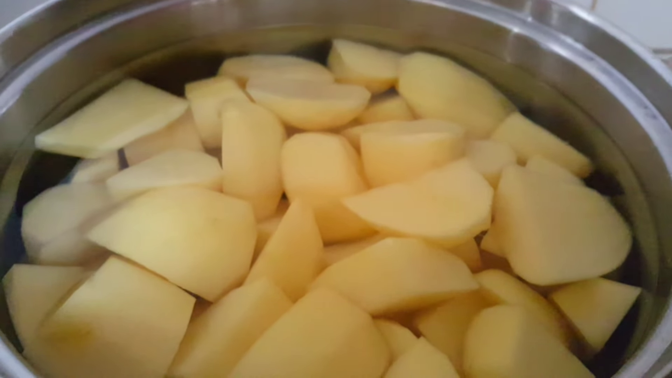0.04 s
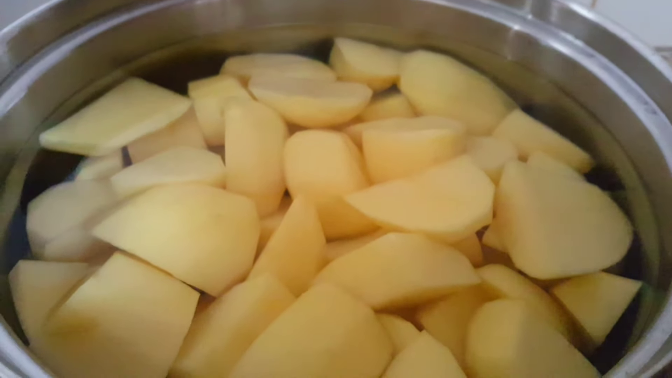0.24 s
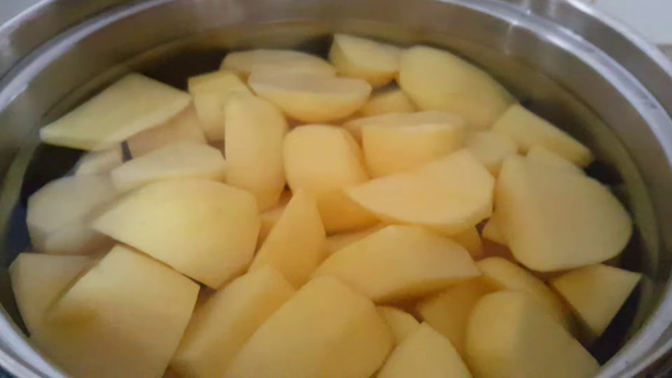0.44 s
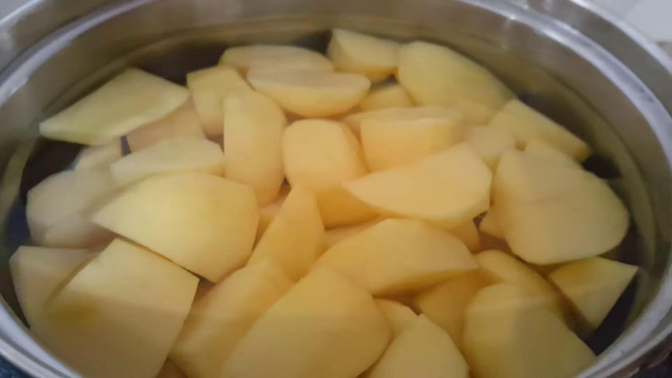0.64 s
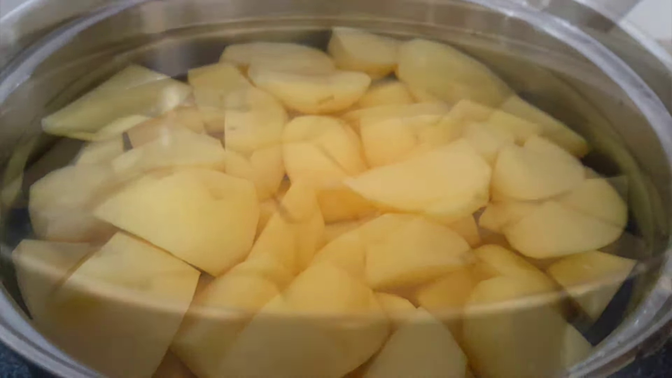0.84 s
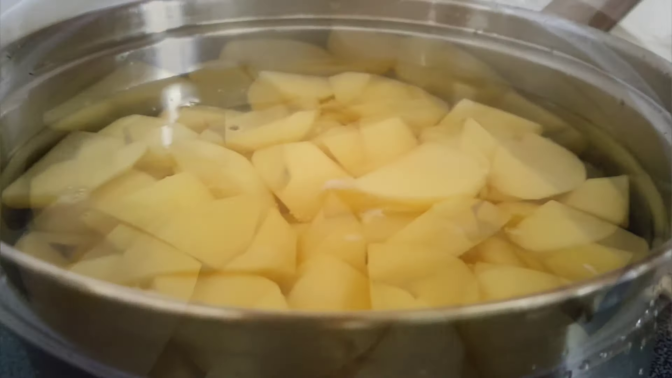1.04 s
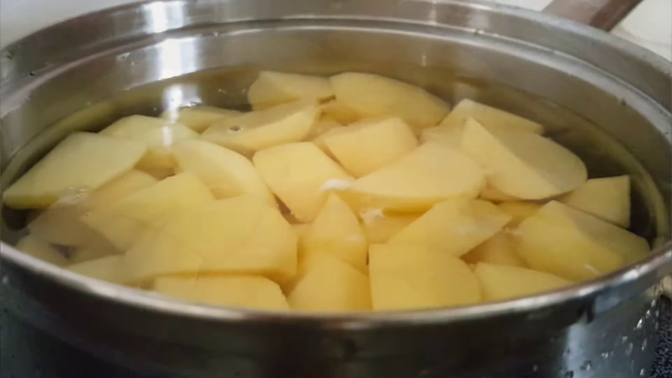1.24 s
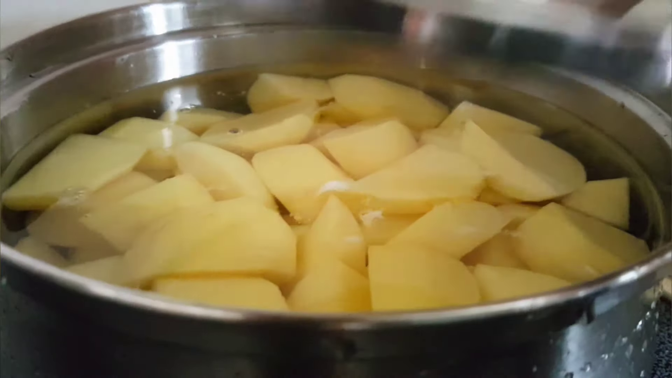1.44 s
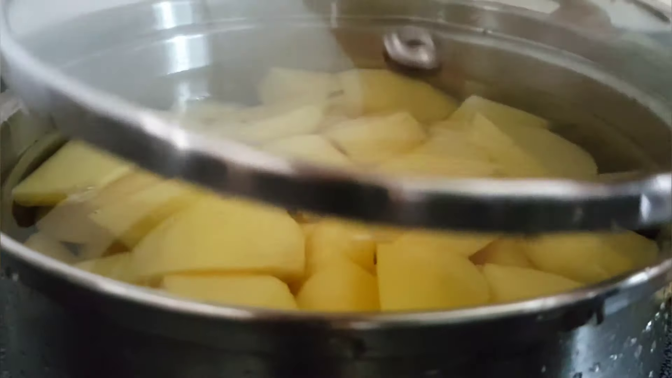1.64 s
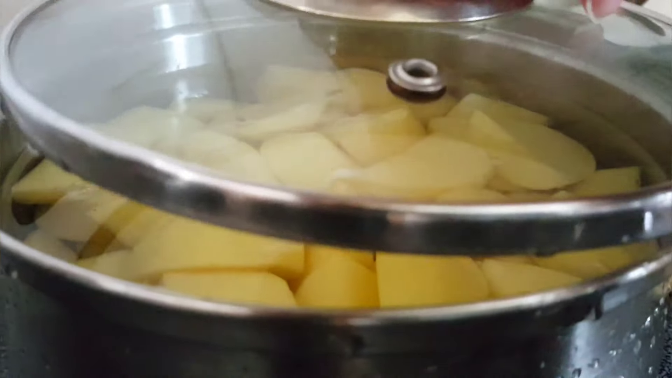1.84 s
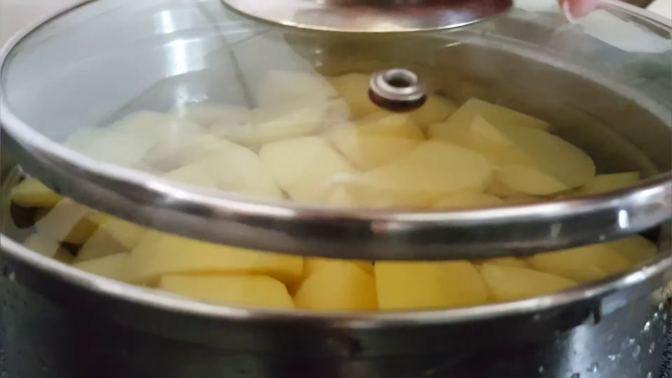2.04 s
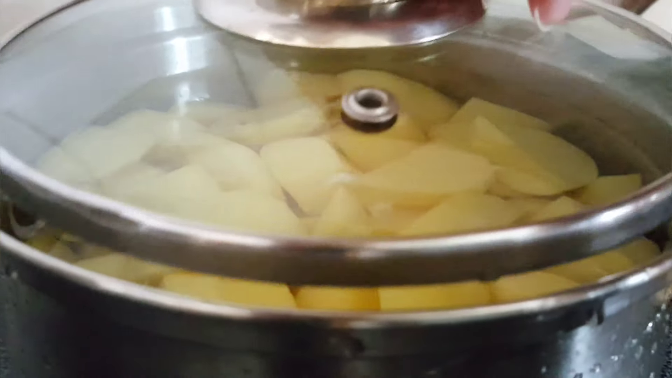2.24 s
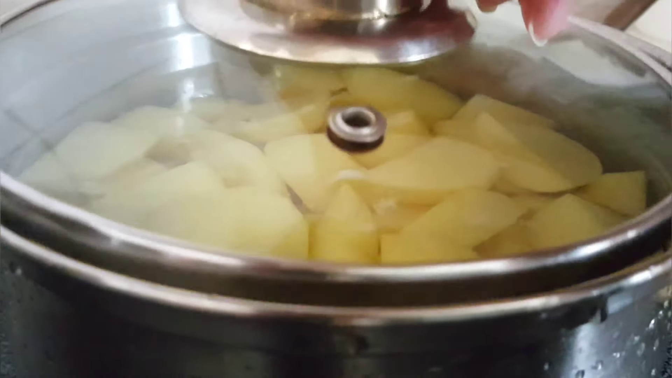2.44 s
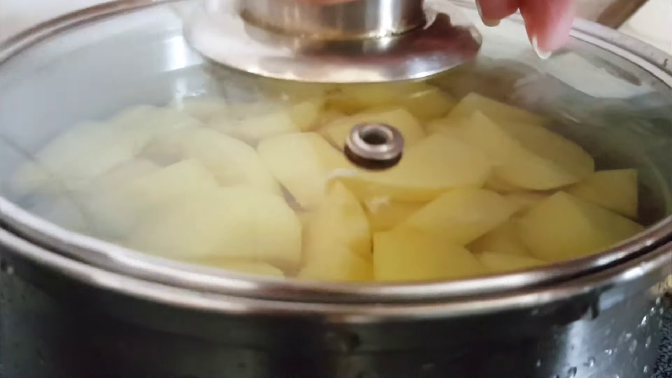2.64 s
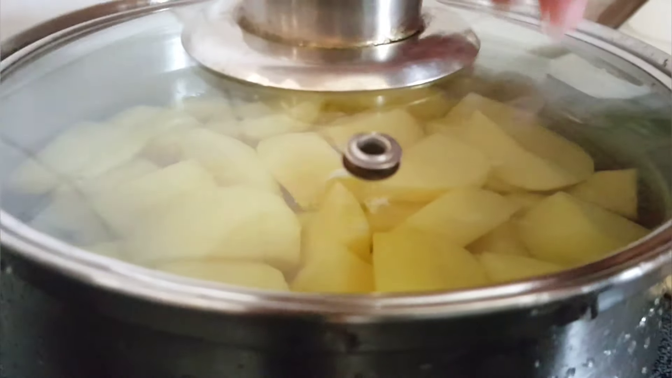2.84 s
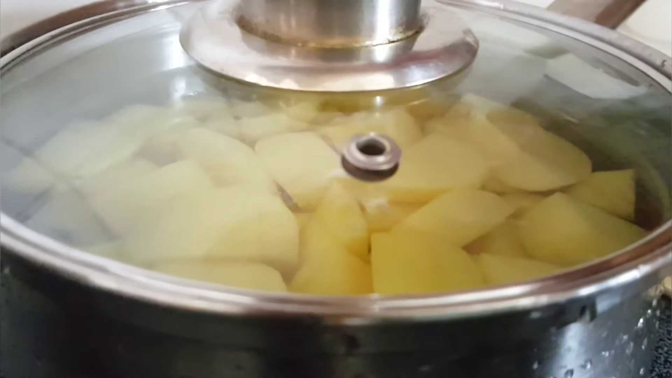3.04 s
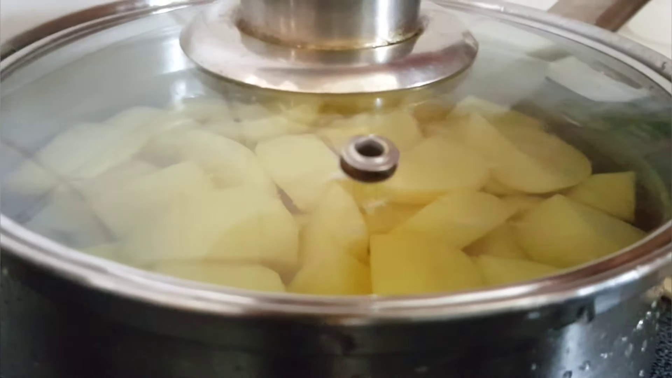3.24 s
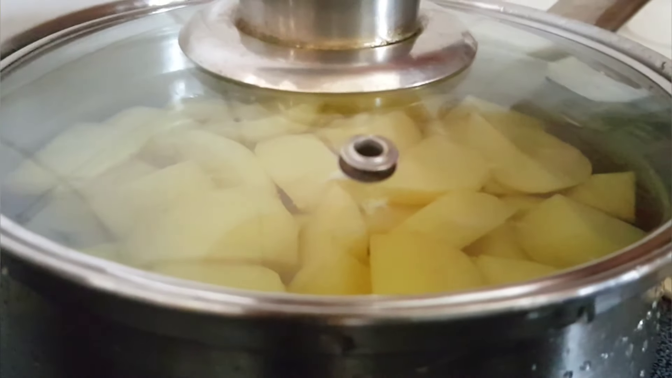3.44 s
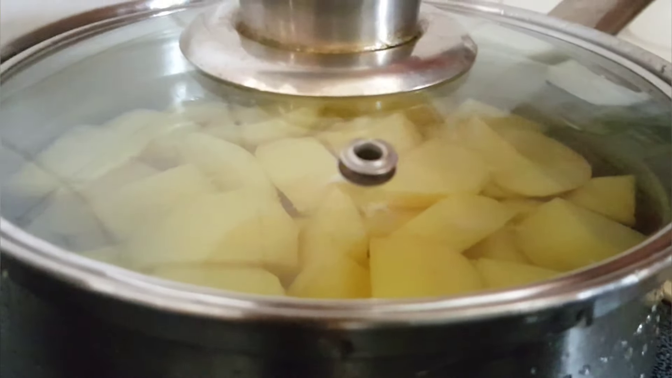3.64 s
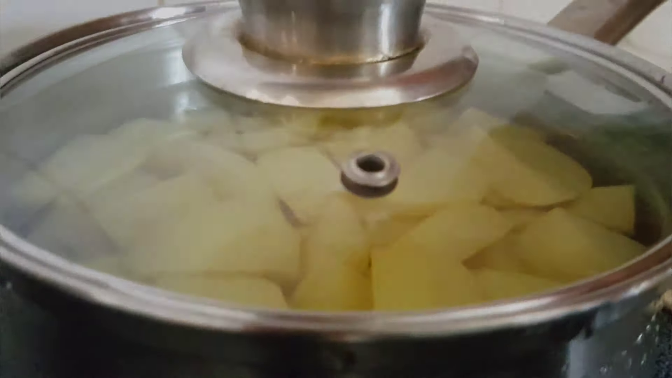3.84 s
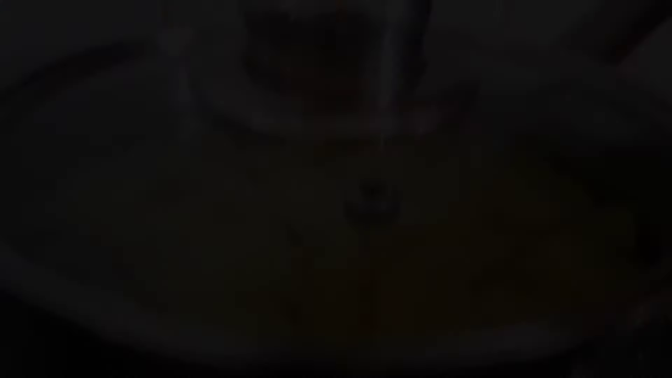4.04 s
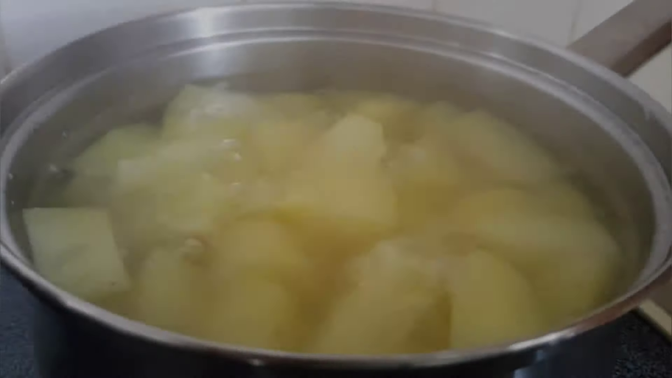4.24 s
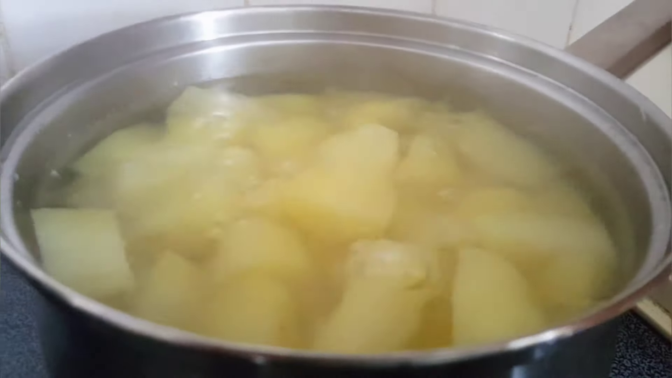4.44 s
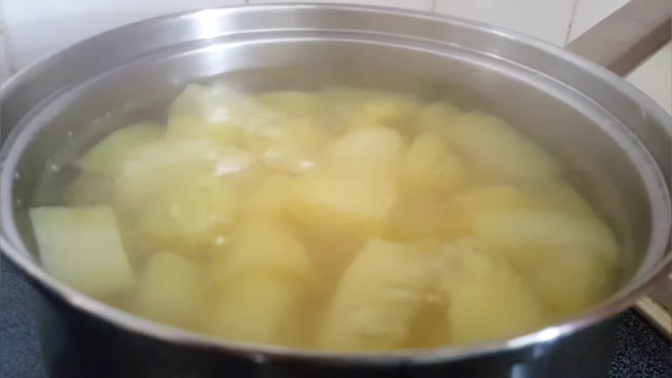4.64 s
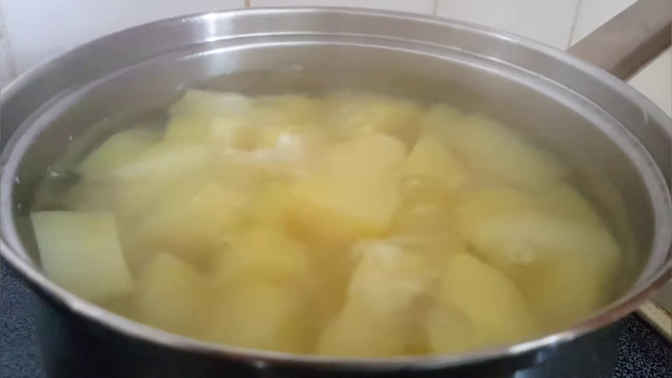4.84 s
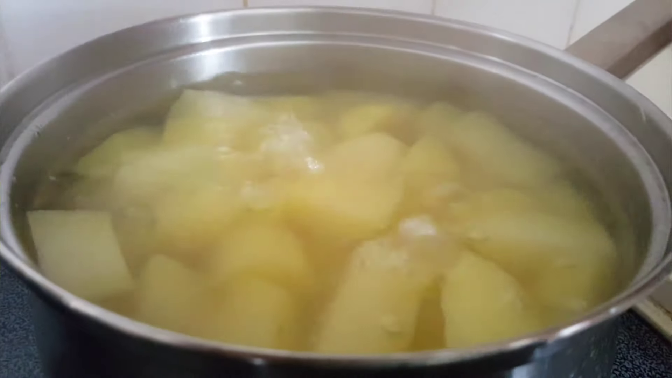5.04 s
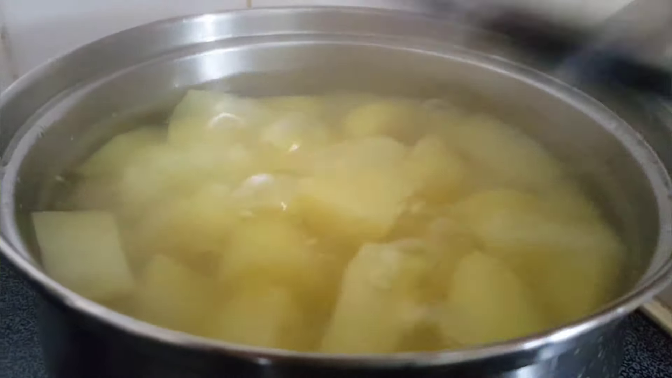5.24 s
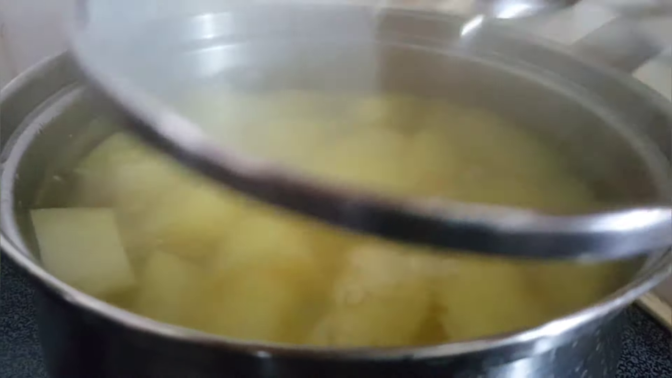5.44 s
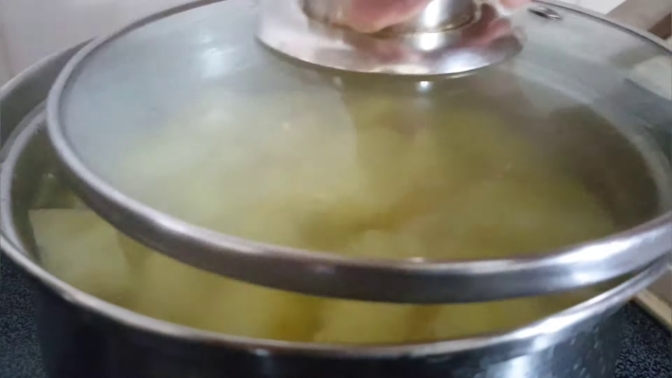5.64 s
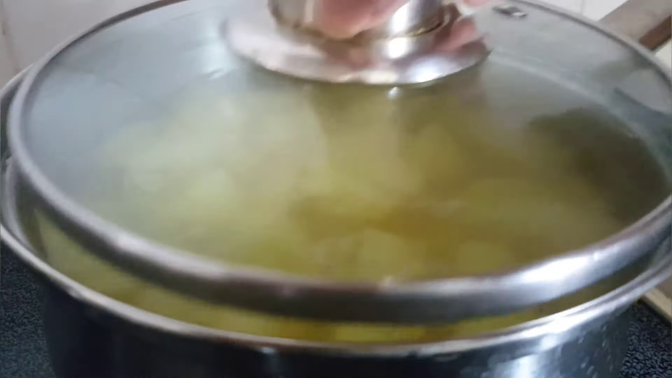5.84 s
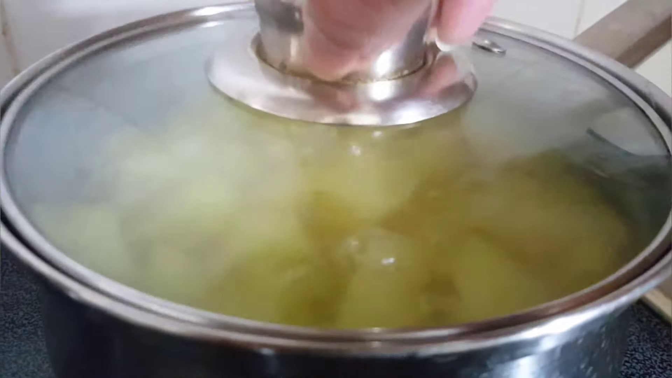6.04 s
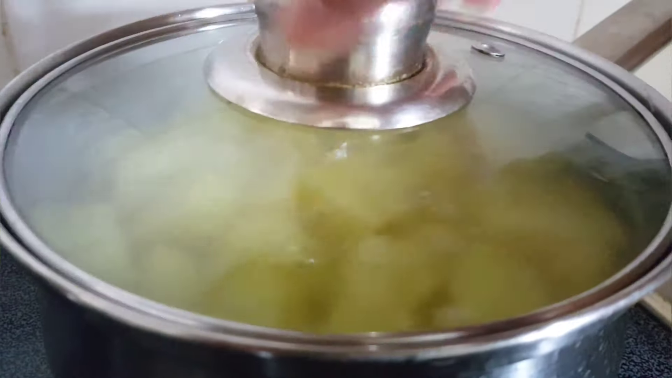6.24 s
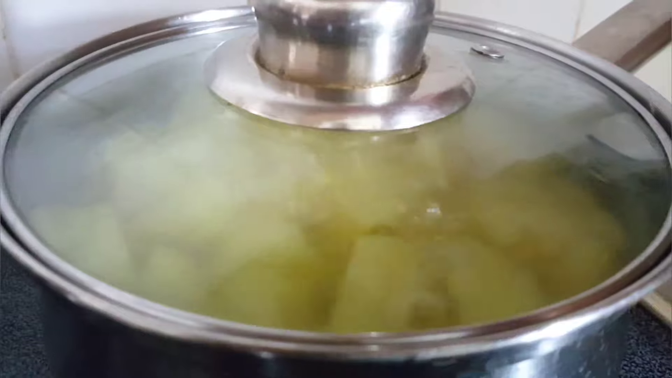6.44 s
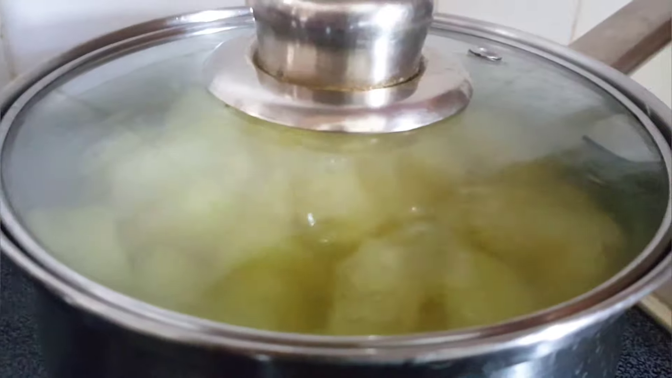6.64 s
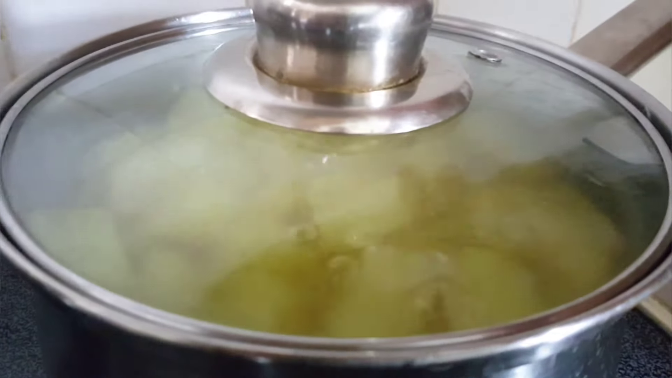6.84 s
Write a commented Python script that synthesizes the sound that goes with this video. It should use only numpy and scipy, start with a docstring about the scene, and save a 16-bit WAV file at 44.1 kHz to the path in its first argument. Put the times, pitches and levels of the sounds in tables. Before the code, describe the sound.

Soft plastic crackling, then a steel-rimmed glass lid knocking shut on a pot, and clattering down again over boiling water.

```python
"""Plastic rustles and crackles as it is handled, beside a cold pot of potatoes in water.
A glass lid with a steel rim taps the pot, slides, squeaks and drops shut; the scene fades out.
The boiling pot fades in: steam pockets thump, bubbles burble and pop, and the lid clatters on
in two bursts of bounces. Each blow cracks, rings the rim and thuds the pot; the kitchen hums."""
import sys
import numpy as np
from scipy import signal
from scipy.fft import rfft, irfft
from scipy.io import wavfile
from scipy.ndimage import uniform_filter1d

SR = 44100
rng = np.random.default_rng(int(sys.argv[2]) if len(sys.argv) > 2 else 0)


def transcribe(signal):
    """Save signal, clipped to [-1, 1], as a 16-bit WAV file at the path in sys.argv[1]."""
    frames = np.atleast_2d(signal).T
    limited = np.clip(frames, -1, 1)
    pcm = np.round(limited * 32767).astype(np.int16)
    wavfile.write(sys.argv[1], SR, pcm)


N = 304290
T = np.arange(N) / SR

# Kitchen reverb. Each row: frequency in Hz, t60 in seconds.
ROOM_T60 = [(200, 0.34), (1800, 0.24), (4000, 0.36), (8000, 0.13), (15000, 0.053)]
# Kitchen background. Each row: frequency in Hz, relative level in dB.
HUM_SPECTRUM = [(12, -29.5), (20, -9.5), (27, -6), (55, 4.5), (101, 0), (154, -4.5), (285, -2.5),
                (558, -16), (678, -18), (1330, -20.5), (1480, -20.5), (7950, -36.5), (9140, -38.5),
                (9950, -41.5), (16000, -35.5)]
# Stereo likeness of the hum. Each row: frequency in Hz, left-right correlation.
HUM_COHERENCE = [(100, 1), (250, 0.09), (600, 0.14), (1500, .01)]
# Handled plastic. Each row: start in seconds, relative level in dB, extra treble in dB.
RUSTLE_CRACKLES = [(0.1208, -44.5, -7), (.1411, -43, -5.5), (0.171, -39, -7), (.193, -36, -12.5),
                   (0.2054, -30.5, -8.5), (0.2251, -35.5, -1), (0.2576, -41.5, -11), (0.2918, -37.5, 4),
                   (0.339, -61, 2.5), (0.3489, -27.5, -4), (0.3933, -41, -9), (0.3993, -32, -2),
                   (0.438, -39.5, -3), (0.4531, -36.5, 2.5), (0.5104, -37.5, -3), (.5302, -40, -5),
                   (.605, -35, -10), (0.617, -31, -11), (.629, -25.5, -6), (.6594, -37, -12),
                   (0.7016, -44, -14), (.7218, -43.5, -14), (.7537, -43, 15), (.7672, -36.5, -2),
                   (0.8146, -31.5, -3), (0.8732, -47, -11), (0.901, -35.5, -9), (0.964, -39.5, 4),
                   (1.0112, -33.5, -6), (1.0463, -46, -1.5), (1.1433, -45, 14), (1.179, -48.5, 6),
                   (1.2346, -43.5, -6), (1.491, -52, -3)]
# Plastic crackle. Each row: frequency in Hz, relative level in dB.
CRACKLE_SPECTRUM = [(240, -52), (400, -21), (588, -15), (1040, -26), (1400, -14.5), (1600, -15.5),
                    (2120, -5), (2550, -14), (3930, -6.5), (6540, -10.5), (9320, -7), (10200, -22.5),
                    (14600, -18.5), (16000, -38.5)]
# Small bubbles. Each row: frequency in Hz, relative density in dB.
BURBLE_SPECTRUM = [(400, 2.5), (760, -12.5), (1100, -10.5), (1500, -18), (2500, -18.5), (3500, -17),
                   (9000, -61)]
# Large steam pockets collapse. Each row: start in seconds, peak in dB.
STEAM_THUMPS = [(4.718, -33), (4.739, -30), (5.048, -35.5), (5.105, -36.5), (5.148, -40), (5.304, -37.5),
                (5.325, -35), (5.5, -34.5), (5.535, -34.5), (6.302, -30.5), (6.379, -36), (6.41, -33.5),
                (6.449, -31), (6.486, -30.5), (6.637, -31.5), (6.76, -33.5), (6.859, -50)]
# Bubbles burst at the surface. Each row: start in seconds, peak in dB, starting pitch in Hz.
SURFACE_POPS = [(4.198, -50.5, 4220), (4.377, -52, 1070), (4.435, -43, 1940), (4.466, -50, 1190),
                (4.491, -49.5, 2270), (4.578, -44, 536), (4.716, -50, 2410), (4.785, -37, 1030),
                (4.868, -38, 770), (4.891, -32, 1265), (4.9, -27.5, 1088), (4.945, -48, 2960),
                (5.012, -45.5, 1400), (5.053, -35, 1040), (5.059, -37.5, 1960), (5.098, -41, 2300),
                (5.114, -43.5, 1710), (5.217, -35, 926), (5.289, -33, 814), (5.345, -47, 3100),
                (5.395, -43.5, 2160), (5.461, -47, 4240), (5.482, -42, 1780), (6.38, -45, 1280),
                (6.64, -52, 715)]
# Pot, water and trapped air. Each row: frequency in Hz, level in dB, t60 in seconds.
POT_MODES = [(84, -9, .12), (113.4, 1, 0.09), (150, -9.5, 0.26), (234.4, -3, 0.069), (295.3, 6, 0.078),
             (313.2, 3, 0.064), (386.6, -6.5, 0.09), (525.2, -14, 0.15), (636.7, -20, 0.16)]
# Lid and rim. Each row: frequency in Hz, level in dB, t60 in seconds.
RIM_MODES = [(873, -6.5, 0.18), (1068, -3, 0.055), (1180, -19, 0.034), (1395, -13.5, 0.17),
             (1666, -3.5, 0.05), (2110, -10, 0.062), (2312, -5.5, 0.082), (2679, -16, 0.11),
             (3194, -3.5, 0.2), (3153, -15.5, 0.082), (3890, -1.5, 0.05), (3964, -11.5, .06),
             (4360, -8.5, 0.15), (4640, -2.5, 0.027), (5330, -10, 0.017), (5900, -26.5, 0.045),
             (6900, -27.5, 0.084), (8100, -16.5, 0.013)]
# Rim squeaks and groans. Each row: start and end in seconds, start and end pitch in Hz,
# start and end level in dB, bandwidth in Hz.
RIM_SQUEAKS = [(2.685, 2.765, 4850, 4350, -56, -58, 200), (2.588, 2.77, 550, 455, -46, -55, 110),
               (2.7, 2.74, 12200, 12000, -63, -62, 1200)]
# Rim slides. Each row: pot and hiss in dB against the rasp, favoured start and end pitch in Hz.
RIM_SLIDES = [(-5.5, -15, 3150, 3740), (-0.9, -9.5, 3800, 2200), (3.5, -13, 4550, 3470)]
# One envelope a slide. Each row: time in seconds, rasp level in dB.
SLIDE_ENVELOPES = [
    [(1.995, -55), (2.1, -49), (2.19, -49.5), (2.21, -47.5), (2.27, -45.5), (2.285, -44.5), (2.35, -50),
     (2.45, -42), (2.485, -52), (2.515, -87)],
    [(2.6, -65.5), (2.65, -57.5), (2.76, -48), (2.8, -52), (2.845, -67), (2.885, -48)],
    [(5.672, -45.5), (5.74, -47), (5.84, -48.5), (5.89, -53), (5.93, -48), (5.96, -85)],
]
# Rim friction. Each row: frequency in Hz, relative level in dB.
RASP_SPECTRUM = [(500, -16), (900, -20.5), (2000, -12), (2600, -20), (4000, -4), (5500, -8), (7000, -11.5),
                 (9300, -16.5), (10300, -21.5), (16000, -41)]
# Blows on the pot. Each row: start in seconds, thud, crack, brightness and ring in dB,
# favoured ring pitch in Hz, clank in dB, favoured clank pitch in Hz, damping (1 is neutral).
POT_KNOCKS = [(1.8413, -25, -27.5, 22.5, -23.5, 3110, -34, 814, 2.1),
              (1.8902, -30.5, -36.5, 19, -36.5, 3130, -41.5, 816, 1.8),
              (1.9908, -38, -36.5, -2.1, -47, 3130, -40.5, 1610, .73),
              (2.3304, -35.5, -46, 6, -56, 3160, -51, 1460, 0.93),
              (2.443, -38.5, -58, 15.5, -43, 3850, -58, 1400, 1),
              (2.588, -35, -38, 9, -51, 3100, -50, 810, 1.4),
              (2.773, -22.5, -22, 21.5, -32, 3540, -39.5, 817, 1.12),
              (2.791, -24, -62, 7, -62, 3900, -52, 766, .85),
              (2.894, -9.5, -10, 1.5, -40, 3836, -25.5, 1380, 1.5),
              (4.4267, -28.5, -27, -13, -56.5, 4530, -38, 2060, 1.6),
              (5.568, -16, -6.5, 1.5, -18.5, 4450, -30.5, 1180, 1.2),
              (5.6083, -14.5, -10.5, -1, -27, 4450, -27, 2300, 1.7),
              (5.625, -15.5, -13, 3.5, -34, 4170, -24, 1030, 2),
              (5.6571, -9.5, -12, 5.5, -19, 3600, -22, 800, 1.53),
              (5.9992, -16.5, -18, 4.5, -31, 2930, -38, 1530, .95),
              (6.0587, -16, -8, -8.5, -30, 3200, -24, 1230, 1.38),
              (6.0859, -17.5, -16, -7, -36.5, 3200, -27.5, 1670, 1.3),
              (6.122, -12.5, -13, -10, -44, 3160, -28, 1220, 4)]
# Contact noise. Each row: frequency in Hz, relative level in dB.
CRACK_SPECTRUM = [(290, -19), (500, -10), (819, -16.5), (2390, -13), (2930, -17), (4600, -16.5),
                  (5240, -24.5), (5880, -28), (7420, -44.5), (7980, -36.5), (16000, -59.5)]
# Microphone balance. Each row: frequency in Hz, left minus right in dB.
MIC_BALANCE = [(60, -2), (150, 3.5), (500, 0.25), (1500, 4), (4000, 2.8), (8000, 5)]

CUT_S, FADE_OUT_S, FADE_IN_S, FADE_POWER = 4.097, 0.48, 0.45, 0.96
HUM_COLD_DB, HUM_BOIL_DB = -65.5, -57.5
FINE_CRACKLE_DB, FINE_HOLD_S, FINE_FALL_DB_PER_S = -68, 1.12, 46
BOIL_OPEN_DB, BOIL_SHUT_DB = (-46.5, -57.5, -74.5), (-47.5, -57.5, -88)  # rumble, burble, spray
SHUT_START_S, SHUT_RAMP_S = 5.46, 1
HISS_RISE_S = 0.046  # the sliding lid gathers speed
CONTACT_S = 0.00012
DEEP_DB, DEEP_PER_BRIGHT = -4.5, 0.4  # bright blows of the tilted lid weigh more under 160 Hz
BAND_LIMIT_HZ = 16200


def amp(db):
    return 10 ** (np.asarray(db) / 20)


def unit_rms(x):
    return x / np.sqrt(np.mean(x ** 2) + 1e-20)


def at_peak(x, db):
    return amp(db) * x / abs(x).max()


def decay(t60_s, size):
    return amp(-60 * T[:size] / t60_s)


def rise(tau_s, size):
    return 1 - np.exp(-T[:size] / tau_s)


def curve_at(points, hz):
    knots_hz, values = np.transpose(points)
    return np.interp(np.log(hz + 1), np.log(knots_hz + 1), values)


def envelope(rows):
    """Gain from (s, dB) rows, silent outside them."""
    times_s, levels_db = np.transpose(rows)
    return amp(np.interp(T, times_s, levels_db, -200, -200))


def colour(x, points):
    """Filter by (Hz, dB) points."""
    hz = np.fft.rfftfreq(x.shape[-1], 1 / SR)
    return irfft(rfft(x) * amp(curve_at(points, hz)), x.shape[-1])


def shaped(x, points):
    return unit_rms(colour(x, points))


def ring(modes, size=9000):
    """One decaying sine a row."""
    hz, db, t60_s = np.transpose(modes)[:, :, None]
    return amp(db) * decay(t60_s, size) * np.sin(2 * np.pi * hz * T[:size])


def place(mix, start_s, sound, left_db):
    """Add an event from its own spot; the right channel leads by about 0.1 ms."""
    lag_s = rng.normal(0.0001, 0.00005)
    for channel, side in enumerate((0.5, -0.5)):
        part = mix[channel, round((start_s + side * lag_s) * SR):][:len(sound)]
        part += amp(side * left_db) * sound[:len(part)]


def grit(per_s, spread_db):
    """Random clicks of either sign, a few large."""
    sizes = rng.standard_normal(N) * amp(spread_db * np.minimum(rng.exponential(1, N), 4))
    return sizes * (rng.random(N) < per_s / SR)


def excite(clicks, response):
    return signal.oaconvolve(clicks, response)[:N]


def scene_fade():
    """Cold scene out, boiling scene in."""
    ramp = np.maximum((CUT_S - T) / FADE_OUT_S, (T - CUT_S) / FADE_IN_S)
    return np.clip(ramp, 0, 1) ** FADE_POWER


def kitchen_reverb(x):
    """Sparse reflections; each band dies at its own rate, the bass is mono."""
    taps = np.zeros((2, SR // 2))
    slots = np.arange(150, SR // 2 - 20, 20)
    arrivals = slots + rng.integers(0, 20, (2, len(slots)))
    np.put_along_axis(taps, arrivals, rng.choice([-1., 1.], arrivals.shape), 1)
    hz, t, bands = signal.stft(taps, SR, nperseg=256)
    bands[1, hz < 500] = bands[0, hz < 500]
    decay_db = -60 * t / curve_at(ROOM_T60, hz)[:, None]
    tilt_db = curve_at([(100, -2), (1000, 0.5), (10000, 1)], hz)[:, None]
    tail = signal.istft(bands * amp(decay_db + tilt_db), SR, nperseg=256)[1]
    return signal.oaconvolve(x.mean(0)[None], tail / np.linalg.norm(tail[0]), axes=1)[:, :N]


def kitchen_hum():
    """Background noise, alike in both channels only in the bass."""
    left, other = rfft(rng.standard_normal((2, N)))
    coherence = np.clip(curve_at(HUM_COHERENCE, np.fft.rfftfreq(N, 1 / SR)), 0, 1)
    right = coherence * left + np.sqrt(1 - coherence ** 2) * other
    gain = amp(np.where(T < CUT_S, HUM_COLD_DB, HUM_BOIL_DB)) * scene_fade()
    return gain * shaped(irfft(np.array([left, right]), N), HUM_SPECTRUM)


def handling_rustle():
    """Plastic rustle and handling crackles over a dying finer crackle."""
    out, size = np.zeros((2, N)), 4000
    noises = rng.standard_normal((len(RUSTLE_CRACKLES), size))
    for (start_s, db, treble_db), draws in zip(RUSTLE_CRACKLES, noises):
        burst = shaped(colour(draws, CRACKLE_SPECTRUM), [(3000, 0), (8000, treble_db)])
        burst *= amp(db - 10) * decay(0.033, size) * rise(0.00074, size)
        place(out, start_s - 0.0005, burst, left_db=2.7 + 8.7 * draws[0])
    fine = [excite(grit(per_s=820, spread_db=8), rng.standard_normal(600) * decay(0.01, 600))
            for _ in out]
    fine_db = FINE_CRACKLE_DB - FINE_FALL_DB_PER_S * np.maximum(T - FINE_HOLD_S, 0)
    return out + amp(fine_db) * shaped(np.array(fine), CRACKLE_SPECTRUM)


def pot_thud(deep_db, draws):
    """Pot modes, unevenly driven; deep_db weights those under 160 Hz."""
    bass_db = (np.array(POT_MODES)[:, :1] < 160) * deep_db
    uneven_db = 1.5 * draws[:len(POT_MODES), None]
    return (ring(POT_MODES) * amp(bass_db + uneven_db)).sum(0) * rise(0.0077, 9000)


def bubble(hz, cycles, glide=0.11):
    """A few cycles, rising in pitch as the bubble nears the air."""
    periods = T[:2500] * hz
    phase = 2 * np.pi * periods * (1 + glide * periods / cycles / 2)
    return np.sin(phase) * np.exp(-2.2 * periods / cycles) * (1 - np.exp(-periods / 0.11))


def boil():
    """Steam pockets thump the pot, small bubbles burble, spray ticks until the lid muffles it."""
    damping = decay(0.12, 9000)
    rumble = excite(grit(per_s=250, spread_db=3.5), ring(POT_MODES).sum(0) * damping)
    rumble = shaped(rumble, [(40, 5.6), (100, 18.2), (200, 8.6), (330, 13), (600, 4.1)])
    thumps, bubbles = np.zeros((2, 2, N))
    for start_s, db in STEAM_THUMPS:
        draws = rng.standard_normal(len(POT_MODES))
        thump = pot_thud(-2.1 + 4 * draws[-1], draws) * damping
        place(thumps, start_s - 0.002, at_peak(thump, db), left_db=1.5)
    for k, hz in enumerate(np.geomspace(450, 8000, num=28)):
        stream = excite(grit(per_s=110, spread_db=0.55), bubble(hz, cycles=4.1))
        bubbles[k % 2] += amp(curve_at(BURBLE_SPECTRUM, hz) + 10 * np.log10(hz)) * unit_rms(stream)
    bubbles = bubbles + 0.25 * bubbles[::-1]
    burble = shaped(bubbles, [(2300, -17), (3200, -24.5)])
    ticks = excite(grit(per_s=25, spread_db=1.1), rng.standard_normal(400) * decay(0.023, 400))
    spray = shaped(bubbles, [(2300, -8.5), (3200, -3)])
    spray += 0.24 * shaped(ticks, [(2500, -22), (5000, 5), (10000, 6), (16000, -10)])
    shut = np.clip((T - SHUT_START_S) / SHUT_RAMP_S, 0, 1)
    bed = sum(amp(open_db + (shut_db - open_db) * shut) * layer
              for open_db, shut_db, layer in zip(BOIL_OPEN_DB, BOIL_SHUT_DB, (rumble, burble, spray)))
    return thumps + (T > CUT_S) * scene_fade() * bed


def surface_pops():
    """Each burst: a main bubble with a splash tick, then a smaller bubble."""
    out, size = np.zeros((2, N)), 2500
    for (start_s, db, hz), draws in zip(SURFACE_POPS, rng.standard_normal((len(SURFACE_POPS), size))):
        splash = shaped(draws, [(400, -11), (1200, 27), (3000, -23), (6000, -26), (16000, -42)])
        splash *= amp(db - 15) * decay(0.022, size)
        main = at_peak(bubble(hz, cycles=5.7 + hz / 600), db)
        place(out, start_s - 0.0005, main + splash, left_db=7.5 + 2.7 * draws[2])
        small = bubble(hz * (1.694 + 0.363 * draws[1]), cycles=3.3 + hz / 300)
        place(out, start_s + 0.0041 + 0.0005 * draws[0], at_peak(small, db - 8), left_db=3.5)
    return out


def rim_squeaks():
    """Narrow noisy whistles glide down as the rim slips home."""
    out = 0
    for start_s, end_s, from_hz, to_hz, from_db, to_db, width_hz in RIM_SQUEAKS:
        hz = np.interp(T, [start_s, end_s], [from_hz, to_hz])
        pole = np.exp(-np.pi * width_hz / SR)
        noise = rng.standard_normal(N) + 1j * rng.standard_normal(N)
        wobble = signal.lfilter([1], [1, -2 * pole, pole * pole], noise)
        whistle = (wobble * np.exp(2j * np.pi * np.cumsum(hz) / SR)).real
        out = out + envelope([(start_s, from_db), (end_s, to_db)]) * unit_rms(whistle)
    return out


def rim_drive_db(favoured_hz, depth_db):
    """Rim modes far from the favoured pitch are driven less."""
    octaves = abs(np.log2(np.array(RIM_MODES)[:, :1] / favoured_hz))
    return -depth_db * np.minimum(octaves * 7.4, 1)


def lid_slides():
    """Dense slips rasp, hiss and thud the pot; rim modes come and go as the contact travels."""
    out = np.zeros((2, N))
    damped_rim = ring(RIM_MODES, 4000) * decay(0.05, 4000)
    for (pot_db, hiss_db, from_hz, to_hz), rows in zip(RIM_SLIDES, SLIDE_ENVELOPES):
        span = slice(round(rows[0][0] * SR), round(rows[-1][0] * SR))
        size = span.stop - span.start
        slips = np.array([grit(per_s=5000, spread_db=2.2) for _ in out])[:, span]
        flicker_db = 2.9 * unit_rms(uniform_filter1d(rng.standard_normal(size), 500))
        slips = (slips + 0.41 * slips[::-1]) * amp(flicker_db)
        wander = uniform_filter1d(rng.standard_normal((len(RIM_MODES), size)), 2000)
        wander_db = 5.5 * unit_rms(uniform_filter1d(wander, 2000))
        drive_db = rim_drive_db(np.linspace(from_hz, to_hz, size), depth_db=11.5) + wander_db
        modes = signal.oaconvolve(slips[:, None] * amp(drive_db), damped_rim[None], axes=2)
        rim = modes[..., :size].sum(1)
        rim = shaped(rim, [(600, -5), (1600, -6), (2500, -7.5), (3500, -5), (9000, 12)])
        rasp = 0.57 * shaped(slips, RASP_SPECTRUM) + 0.5 * rim
        hiss = shaped(slips, [(6000, -22.5), (8000, -5.5), (9500, -1), (10500, -10),
                              (13000, -4), (16000, -8.5)]) * rise(HISS_RISE_S, size)
        pot = excite(grit(per_s=320, spread_db=2.3), ring(POT_MODES).sum(0))[span]
        pot = shaped(pot, [(70, -10.5), (200, -4), (330, -2), (600, 7)])
        out[:, span] += envelope(rows)[span] * (rasp + amp(pot_db) * pot + amp(hiss_db) * hiss)
    return out


def contact_crack(bright_db, draws):
    """The glass flexes in a click; noise snaps and leaves a longer, slightly brighter tail."""
    size = len(draws)
    click = np.sin(2 * np.pi * 1150 * T[:size]) * decay(0.0098, size)
    noise = shaped(colour(draws, CRACK_SPECTRUM), [(3000, 0), (7000, bright_db)])
    snap = noise * decay(0.018, size)
    tail = colour(noise, [(2600, -9.5), (5000, -7)]) * decay(0.07, size)
    return click + 0.66 * (snap + tail) * rise(CONTACT_S, size)


def lid_knocks():
    """Each blow cracks, thuds the pot and drives the rim: low modes clank, high modes ring."""
    out, size = np.zeros((2, N)), 9000
    low = np.array(RIM_MODES)[:, 0] < 2500
    for knock, draws in zip(POT_KNOCKS, rng.standard_normal((len(POT_KNOCKS), size))):
        start_s, thud_db, crack_db, bright_db, ring_db, ring_hz, clank_db, clank_hz, damping = knock
        uneven_db = 1.5 * draws[-len(RIM_MODES):, None]
        modes = ring(RIM_MODES) * amp(uneven_db) * rise(0.0018, size)
        clank = (modes * amp(rim_drive_db(clank_hz, depth_db=23)))[low].sum(0)
        ringing = (modes * amp(rim_drive_db(ring_hz, depth_db=9.5)))[~low].sum(0)
        thud = pot_thud(DEEP_DB + DEEP_PER_BRIGHT * bright_db, draws)
        resonance = at_peak(thud, thud_db) + at_peak(clank, clank_db) + at_peak(ringing, ring_db)
        resonance *= amp(-400 * (damping - 1) * T[:size])
        crack = at_peak(contact_crack(bright_db, draws), crack_db)
        place(out, start_s, crack + resonance, left_db=1.5)
    return out


def scene():
    lid = lid_knocks() + lid_slides() + rim_squeaks()
    water = surface_pops() + boil()
    rustle = handling_rustle()
    room = kitchen_reverb(amp(-12.5) * lid + amp(-9.5) * water + amp(-10) * rustle)
    return lid + water + rustle + room + kitchen_hum()


def record(dry):
    """Two close microphones, the left nearer the rim; deep bass loss, then the band limit."""
    side = amp(curve_at(MIC_BALANCE, np.fft.rfftfreq(N, 1 / SR)) / 2)
    mics = irfft(rfft(dry) * np.array([side, 1 / side]), N)
    mics = colour(mics, [(25, -13.5), (45, -9), (75, -1), (15000, 2.5), (16000, 2)])
    lowpass = signal.firwin(511, BAND_LIMIT_HZ, window=("kaiser", 9), fs=SR)
    return signal.oaconvolve(mics, lowpass[None], "same")


dry = scene()
out = record(dry)
transcribe(out)
```